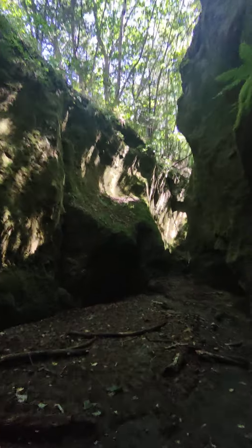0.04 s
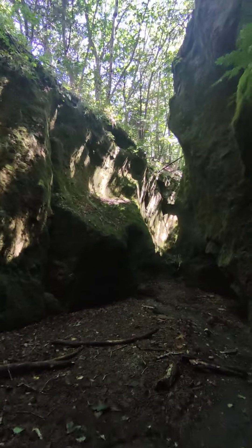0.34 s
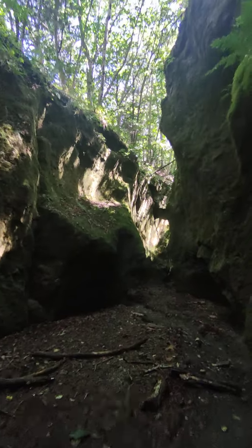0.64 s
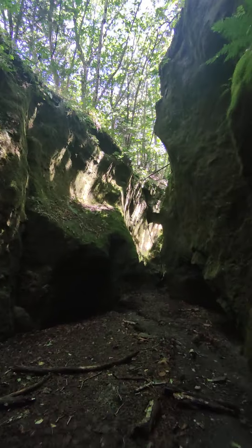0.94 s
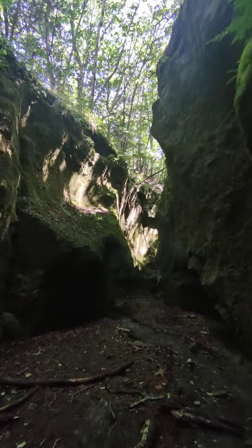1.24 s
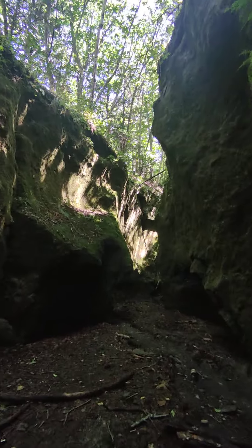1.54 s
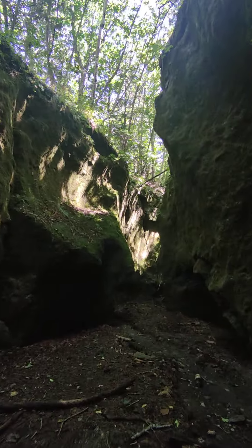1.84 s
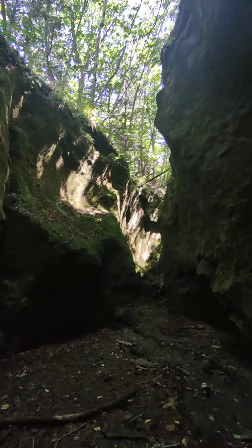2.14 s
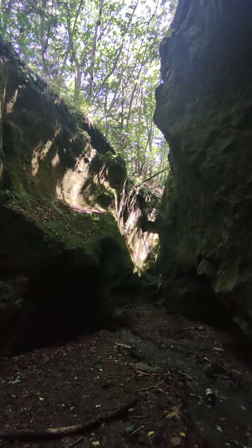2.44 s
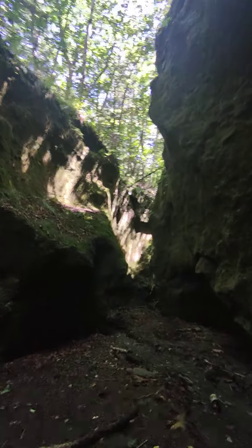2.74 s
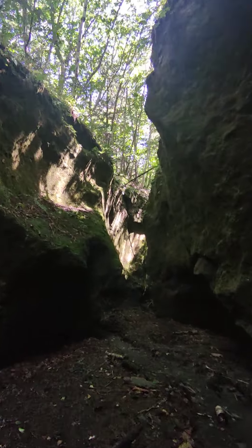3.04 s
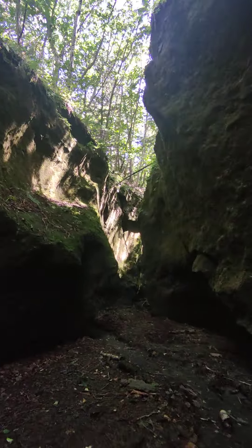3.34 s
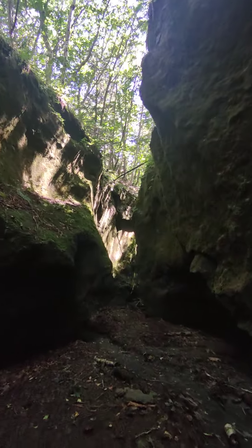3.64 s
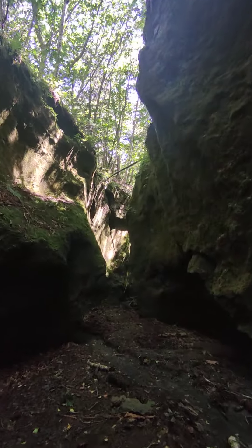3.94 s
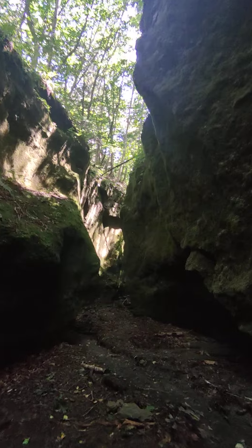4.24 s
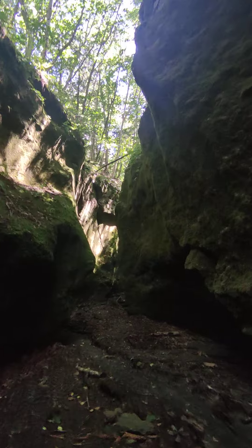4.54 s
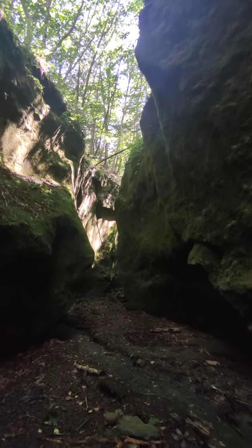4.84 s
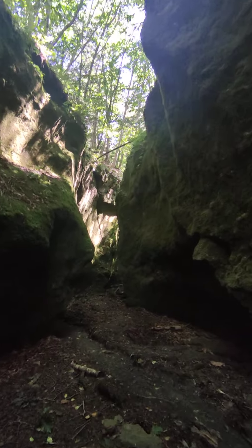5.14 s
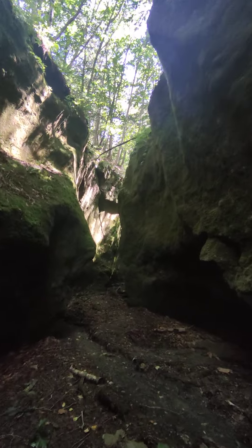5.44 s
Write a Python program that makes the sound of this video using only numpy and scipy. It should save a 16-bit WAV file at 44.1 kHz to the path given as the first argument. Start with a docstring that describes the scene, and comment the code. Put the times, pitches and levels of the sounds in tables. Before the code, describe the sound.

A small metal bell jingles unevenly up close while boots crunch over damp earth, leaves and snapping twigs.

```python
"""Bear bell in a rock gorge

A small metal bell swings on a walker, close to the left of the microphones. Its clapper strikes with the
stride and excites five decaying modes; the walls return the ring, Doppler-spread by the walker's motion.
Boots press into damp earth and leaves, twigs snap, a stick knocks, air buffets and a far bird whistles."""
import sys
import numpy as np
from scipy import signal
from scipy.fft import rfft, irfft, next_fast_len
from scipy.io import wavfile
from scipy.ndimage import map_coordinates

SR = 44100
rng = np.random.default_rng(int(sys.argv[2]) if len(sys.argv) > 2 else 0)


def output_pcm(signal):
    """Save a mono or channel-first signal as 16-bit PCM at the path in sys.argv[1].

    Samples are clipped to [-1, 1] before scaling.
    """
    pcm = np.clip(np.atleast_2d(signal).T, -1, 1) * 32767
    wavfile.write(sys.argv[1], SR, np.round(pcm).astype(np.int16))


N = 250488

# clapper strikes; the spot hit on the rim leans the low pair toward its first mode:
# start_s, low_pair_db, lean_db, high_mode_db, top_pair_db, click_db
STRIKES = [(0.21, -42, -1, -38, -32, -40.5), (0.495, -33, 5.5, -24.5, -32, -38),
           (0.504, -31.5, 5.5, -34.5, -42, -39), (0.7871, -27, 3.5, -17, -18, -27),
           (0.9106, -31.5, 11.5, -22.5, -31, -33), (1.0668, -28.5, -1.5, -28.5, -25, -26.5),
           (1.096, -29.5, -4, -23, -33, -39.5), (1.144, -45, 0, -36, -43.5, -59),
           (1.5818, -27, -5, -32.5, -23.5, -34.5), (1.8417, -48, -0.5, -32, -36, -36.5),
           (2.158, -44.5, -3.5, -36, -47.5, -55), (2.202, -35, 2, -42, -29.5, -39.5),
           (2.4138, -28.5, 6, -30.5, -38, -37), (2.582, -39.5, -2.5, -34, -42, -42.5),
           (3.2818, -26.5, -4, -18.5, -23.5, -30), (3.622, -48, 0.5, -44, -51.5, -59),
           (3.765, -38, 2.5, -24.5, -26, -31.5), (3.7881, -47, -1.5, -41.5, -33, -44),
           (4.024, -33, -7.5, -22, -22.5, -30.5), (5.2565, -35, -1.5, -33, -32.5, -38.5),
           (5.478, -44, 3, -48.5, -46, -51), (5.5784, -40, 6.5, -31, -33, -43.5)]
# speed of the bell past the walls, low while the walker pauses: time_s, speed_m_per_s
PACE = [(.4, 0.47), (.6, 0.94), (2.6, 0.96), (2.9, 0.28), (3.25, 0.3), (3.4, 0.76), (4.3, 0.8),
        (4.55, 0.26), (5.2, 0.19), (5.35, 0.554)]


def amp(db):
    """Amplitude ratio of a level in decibels."""
    return np.exp(np.asarray(db) * (np.log(10) / 20))


def unit(x):
    """Normalisation to rms 1."""
    return x / np.sqrt(np.mean(np.abs(x) ** 2) + 1e-20)


def along(points, hz):
    """Interpolation on a logarithmic frequency axis."""
    point_hz, values = np.transpose(points)
    return np.interp(np.log(hz + 1), np.log(point_hz + 1), values)


def curves(rows):
    """Linear interpolation in time: one value per sample for each column after the first."""
    times, *columns = np.transpose(rows)
    return [np.interp(np.arange(N) / SR, times, column) for column in columns]


def wobble(rate):
    """Smooth random modulation of rms 1; its rate, in knots a second, may vary with time."""
    clock = np.cumsum(np.broadcast_to(np.abs(rate), N)) / SR
    coarse = np.arange(0, N, 32)
    knots = rng.standard_normal(4096)
    return unit(np.interp(np.arange(N), coarse, map_coordinates(knots, [clock[coarse]], mode="wrap")))


def filtered(x, response):
    """Linear filtering: the spectrum is multiplied by a frequency response."""
    size = next_fast_len(x.shape[-1] + 8192)
    return irfft(rfft(x, size) * response(np.fft.rfftfreq(size, 1 / SR)), size)[..., :x.shape[-1]]


def colour(x, spectrum):
    """Spectral shaping by (frequency_hz, level_db) points, at rms 1."""
    return unit(filtered(x, lambda hz: amp(along(spectrum, hz))))


def fading(times, sizes, t60):
    """Exponential decay: superposed steps, each falling 60 dB in t60 seconds."""
    kicks = np.bincount(np.clip(np.round(np.asarray(times) * SR).astype(int), 0, N - 1), sizes, N)
    return signal.lfilter([1], [1, -np.exp(-np.log(1000) / (t60 * SR))], kicks)


def ports(x, left_db, lag_samples=18):
    """Level and time difference between two microphone ports; the right one hears later."""
    return np.array([x * amp(left_db / 2), np.pad(x, (lag_samples, 0))[:N] * amp(-left_db / 2)])


def in_gorge(x, left_db, wet_db):
    """Reverberation: direct sound plus its convolution with the short response of the rock walls."""
    # reverberation time: frequency_hz, t60_s
    decay = [(200, 0.28), (2000, 0.24), (12000, 0.25)]
    hz, t, noise = signal.stft(rng.standard_normal((2, SR // 2)), SR, nperseg=256)
    tail = signal.istft(noise * amp(-60 * t / along(decay, hz)[:, None]), SR, nperseg=256)[1]
    tail = np.pad(tail / np.linalg.norm(tail[0]), ((0, 0), (SR // 200, 0)))
    return ports(x, left_db) + amp(wet_db) * signal.fftconvolve(x[None], tail, axes=1)[:, :N]


def air():
    """Turbulence: low buffeting, mostly uncorrelated between the ports, and one puff on the right."""
    buffet_db = -56.5 + 2.1 * wobble(2.02)
    eddies = rng.standard_normal((2, N)) + 0.4 * rng.standard_normal(N)
    rumble = colour(eddies, [(10, -17.5), (28, 0.5), (50, -3.5), (100, -8.5), (180, -16.5), (500, -40.5)])
    gusts = amp(3.0 * np.array([wobble(18), wobble(18)]))
    swell = amp(-47.5) * np.exp(-np.abs(np.arange(N) / SR - .17) / 0.023)
    puff = swell * colour(rng.standard_normal(N), [(25, 10), (110, 3), (200, -15), (400, -50)])
    return amp(buffet_db) * unit(rumble * gusts) + ports(puff, left_db=-24.0)


def bird():
    """Nearly pure tones with slight phase modulation: faint whistles from the trees on the right."""
    # whistles: start_s, length_s, pitch_hz, level_db
    whistles = [(5.084, 0.057, 2692, -51), (5.152, 0.034, 2712, -60), (5.382, 0.066, 2655, -61),
                (5.448, 0.062, 2658, -55)]
    t = np.arange(N) / SR
    song = np.zeros(N)
    for start_s, length_s, pitch_hz, level_db in whistles:
        swell = np.sqrt(np.abs(np.sin(np.pi * np.clip((t - start_s) / length_s, 0, 1))))
        song += amp(level_db) * swell * np.sin(2 * np.pi * pitch_hz * t + .5 * wobble(60))
    return in_gorge(song, left_db=-12, wet_db=1)


def footfalls():
    """Incoherent sounds add in power: gains of soil, scuff and leaves from steps over a steady shuffle."""
    # steps, rising and falling by 20 dB: full_weight_s, soil_db, scuff_db, leaves_db, rise_s, fall_s
    steps = [(0.0, -52.5, -51, -58, .2, 0.33), (0.635, -50.5, -44.5, -50.5, 0.32, 0.18),
             (1.292, -52.5, -48.5, -62, 0.6, .5), (1.91, -68, -47.5, -57.5, 0.14, 0.73),
             (2.15, -50, -51, -59, 0.8, .13), (2.821, -47, -44, -58.5, 0.39, 0.18),
             (3.591, -52, -50, -57, 0.68, 0.33), (3.948, -55, -50, -54.5, 0.18, 0.32),
             (4.948, -44, -48.5, -54.5, 0.07, 0.25), (5.17, -62, -53.5, -62, 0.25, 0.68)]
    t = np.arange(N) / SR
    speed, = curves(PACE)
    shuffle_db = np.array([[-59.5], [-60.5], [-71.5]]) + 5.5 * (speed - 1)  # grows with the pace
    power = amp(shuffle_db) ** 2
    for full_weight_s, soil_db, scuff_db, leaves_db, rise_s, fall_s in steps:
        press = amp(-20 * np.maximum((full_weight_s - t) / rise_s, (t - full_weight_s) / fall_s))
        power = power + (amp([[soil_db], [scuff_db], [leaves_db]]) * press) ** 2
    return np.sqrt(power)


def crunch(spectrum, cracks_per_s, spread_db, bed_db):
    """Shot noise: tiny cracks of uneven size over a bed of friction noise, both in clumps."""
    sizes = rng.choice([-1, 1], N) * amp(spread_db * np.clip(rng.standard_normal(N), -2, 2))
    cracks = (rng.random(N) < cracks_per_s / SR) * sizes
    clumps = amp(3.77 * wobble(70))
    return colour(clumps * (unit(cracks) + amp(bed_db) * rng.standard_normal(N)), spectrum)


def boots():
    """Granular noise under load: soil gives way, the sole grinds over grit, and leaves rustle."""
    # spectra of the three noises: frequency_hz, level_db
    soil_spectrum = [(40, -27), (110, -11), (200, -3), (450, 2), (750, -3.5), (1100, -4), (2500, -42)]
    scuff_spectrum = [(400, -13.5), (800, -3), (1400, 2), (2100, -1.5), (3000, -8), (4500, -12.5),
                      (8000, -26), (16000, -41.5)]
    leaf_spectrum = [(1500, -2.5), (3500, 3.5), (5200, 0), (7500, -5.5), (9500, -3.5), (13000, -11),
                     (15500, -9.5)]
    weight, grind, brush = footfalls()
    soil = weight * crunch(soil_spectrum, cracks_per_s=300, spread_db=5.5, bed_db=4.5)
    scuff = grind * crunch(scuff_spectrum, cracks_per_s=400, spread_db=7.5, bed_db=1.0)
    leaves = brush * crunch(leaf_spectrum, cracks_per_s=600, spread_db=1.0, bed_db=6)
    return (in_gorge(soil, left_db=0.0, wet_db=-12.0)
            + in_gorge(scuff, left_db=8.0, wet_db=-4.5)
            + in_gorge(leaves, left_db=15.0, wet_db=6.0))


def twigs():
    """Brittle fracture: each snap excites a woody resonance and a soft thud in the ground."""
    # twigs and grit breaking underfoot: start_s, snap_db, pitch_hz, thud_db
    snaps = [(0.071, -40, 600, -68), (0.634, -30, 1740, -55), (0.776, -46, 500, -50),
             (1.191, -48, 2220, -57), (1.244, -47.5, 1800, -74), (2.726, -61, 595.7, -58),
             (2.758, -47.5, 1950, -41), (2.809, -31.5, 1830, -50), (2.858, -34, 2000, -57),
             (3.281, -38.5, 2340, -49.5), (3.671, -43, 1800, -42.5), (3.71, -43, 1100, -63),
             (4.167, -46.5, 990, -65), (4.281, -38.5, 1041, -76), (4.405, -35.5, 831, -61),
             (4.938, -30.5, 1930, -41.5), (4.959, -29, 2010, -37), (4.973, -28.5, 1360, -45),
             (5.155, -35, 1220, -51.5)]
    # spectra of snap and thud: frequency_hz, level_db
    snap_spectrum = [(300, -7), (800, -1.5), (1500, -3), (2400, -9), (4000, -63), (15000, -2)]
    thud_spectrum = [(40, -19), (130, 16.5), (350, 7), (700, -2.5), (2000, -34.5)]
    t = np.arange(SR // 8) / SR
    out = np.zeros(N + SR)
    for start_s, snap_db, pitch_hz, thud_db in snaps:
        resonance = lambda hz: 1 / np.hypot(1, 2 * (hz / pitch_hz - pitch_hz / (hz + 1)))
        wood = filtered(rng.standard_normal(len(t)), resonance)
        snap = amp(snap_db - 60 * t / 0.028) * colour(wood, snap_spectrum)
        thud = amp(thud_db - 0.5 - 60 * t / 0.12) * colour(rng.standard_normal(len(t)), thud_spectrum)
        out[round(start_s * SR):][:len(t)] += snap + thud
    return in_gorge(out[:N], left_db=8, wet_db=-4.0)


def stick(start_s=3.02, pitch_hz=1340):
    """One heavily damped mode: a loose stick tips over and knocks once."""
    envelope = fading([start_s], [amp(-38.5)], t60=0.029)
    note = np.sin(2 * np.pi * pitch_hz * np.arange(N) / SR + .5 * wobble(200))
    return ports(envelope * note, left_db=17.5)


def clapper(rebound_s=0.018, rebound_db=-9.5):
    """Impact noise: metal ticks on metal, rebounds lightly, and the sound scatters off the rock."""
    # spectrum of the contact: frequency_hz, level_db
    spectrum = [(900, -45), (1900, 0.5), (3000, -6), (4300, 9.5), (5200, 4), (6500, 1.5), (7450, 3.5),
                (8500, -8), (11500, 2.5), (13000, -6), (16000, -32.5)]
    times, click_db = np.array(STRIKES)[:, [0, -1]].T
    times = np.append(times, times + rebound_s * np.exp(0.23 * rng.standard_normal(len(times))))
    click_db = np.append(click_db, click_db + rebound_db)
    tick = fading(times, amp(click_db + 6), t60=0.006) * colour(rng.standard_normal(N), spectrum)
    scatter = fading(times + 0.0042, amp(click_db - 9.0), t60=0.14)
    return ports(tick, left_db=10) + scatter * colour(rng.standard_normal((2, N)), spectrum)


def tilt(depth_db=-2, half_length_s=0.04, full_swing_s=0.2):
    """Directivity dip in dB: the bell tips away as a full swing ends and is back when the clapper lands."""
    t = np.arange(N) / SR
    times = np.array(STRIKES)[:, 0]
    ends = times[1:][np.diff(times) > full_swing_s]
    return depth_db * sum(np.maximum(1 - ((t - end + half_length_s) / half_length_s) ** 2, 0) for end in ends)


def struck_mode(hz, t60, strike_db, initial_db):
    """Envelope and phase of a damped mode: a strike adds energy and jolts a weak ring's phase the most."""
    times = np.array(STRIKES)[:, 0]
    energy = fading(np.append(times, 0), amp(np.append(strike_db, initial_db)) ** 2, t60 / 2)
    ring = np.sqrt(np.abs(energy))
    onsets = np.round(times * SR).astype(int)
    jolts = rng.uniform(-np.pi, np.pi, len(onsets)) * np.minimum(amp(strike_db) / ring[onsets], 1)
    return ring, 2 * np.pi * hz * np.arange(N) / SR + np.cumsum(np.bincount(onsets, jolts, N))


def radiated(hz, ring, phase, facing_db, direct_db, echo_db):
    """Multipath propagation: a mode arrives as a direct tone plus Doppler-spread wall echoes."""
    speed, = curves(PACE)
    sway_m = 0.01 * wobble(4 * speed)  # change in distance to the microphones
    rocking_db = 2.54 * wobble(22 * speed)  # the bell rocks on its strap
    wavenumber = 2 * np.pi * hz / 343
    tone = ring * amp(facing_db + rocking_db) * np.sin(phase + wavenumber * sway_m)
    # the walls are close: their answer builds up and lingers for about 10 ms
    pole = np.exp(-1 / (.01 * SR))
    delayed_energy = np.pad(ring ** 2, (SR // 250, 0))[:N]
    lingering = np.sqrt(np.abs(signal.lfilter([1 - pole], [1, -pole], delayed_energy)))
    # paths lengthen and shorten with the walk, so each echo is a narrow band round the mode
    spread_hz = .8 * wavenumber * speed
    carrier = 2 * np.pi * hz * np.arange(N) / SR
    cos, sin = np.cos(carrier), np.sin(carrier)
    band = np.array([wobble(spread_hz) * cos + wobble(spread_hz) * sin for side in range(2)]) / np.sqrt(2)
    # the walls gather sound from all sides, so they follow the bell's turning only in part
    echo = lingering * amp(0.73 * facing_db) * band
    return amp(direct_db) * ports(tone, left_db=5.5) + amp(echo_db) * echo * amp([[-3], [3]])


def bell(high_directivity=0.3):
    """Mode splitting: the low pair beats, its lobes alternating as the bell twists; high modes die fast."""
    # a split low pair, a single high mode and a split top pair: frequency_hz, t60_s
    modes = [(4197, 2.27), (4268, 2.442), (10866, 0.63), (11308, 0.21), (11440, 0.42)]
    # the bell turns on its strap; twist favours the first mode over the second: time_s, facing_db, twist_db
    turning = [(0.0, 2.5, 0), (0.19, 9, 6.5), (0.3, -6, -6), (0.54, -1, -2), (0.87, 4, -5), (1.17, -7, 5),
               (1.7, -8, 1.5), (2.2, 2.5, 5.5), (2.5, -2, -5.5), (2.85, -15, 0.5), (3.0, -3, 7),
               (3.37, 3.5, -4), (3.77, 9.5, 3.5), (3.9, -7.5, -10), (4.3, -2.5, 1.5), (4.66, 6, -1),
               (5.1, 5, -4), (5.66, -5.5, 6.5)]
    # stereo balance of the swinging bell: time_s, left_minus_right_db
    swing = [(0.0, 3), (0.27, 12.5), (0.36, 4.5), (1.34, 3.5), (1.52, 9), (2.75, 2.5), (3.05, 11.5),
             (3.54, 3), (3.89, 13.5), (4.1, -3), (4.65, 19), (5.09, -9.5), (5.19, 6.5), (5.68, 3.5)]
    _, low_db, lean_db, high_db, top_db, _ = np.transpose(STRIKES)
    facing_db, twist_db = curves(turning)
    facing_db = facing_db + tilt()
    out = np.zeros((2, N))
    for (hz, t60), lobe, initial_db in zip(modes, (1, -1), (-36, -40)):
        ring, phase = struck_mode(hz, t60, low_db + lobe * lean_db, initial_db)
        out += radiated(hz, ring, phase, facing_db + lobe * twist_db, direct_db=-4.0, echo_db=-4.5)
    for (hz, t60), strike_db in zip(modes[2:], (high_db, top_db - 0.5, top_db - 7)):
        ring, phase = struck_mode(hz, t60, strike_db, initial_db=-57)
        out += radiated(hz, ring, phase, high_directivity * facing_db, direct_db=-2.5, echo_db=-1.5)
    left_db, = curves(swing)
    return out * amp([left_db / 2, -left_db / 2])


def scene():
    """Superposition of bell, walker and surroundings."""
    return bell() + clapper() + boots() + twigs() + stick() + bird() + air()


def record(dry, cutoff_hz=15900):
    """Band limiting by a steep low-pass filter."""
    return filtered(dry, lambda hz: 1 / (1 + (hz / cutoff_hz) ** 120))


dry = scene()
out = record(dry)
output_pcm(out)
```